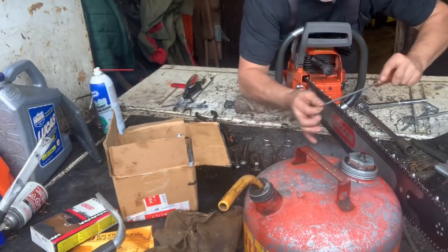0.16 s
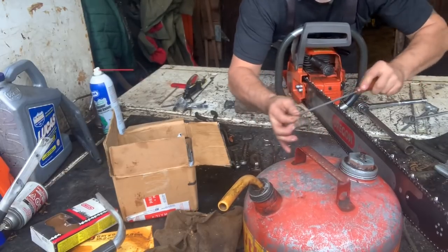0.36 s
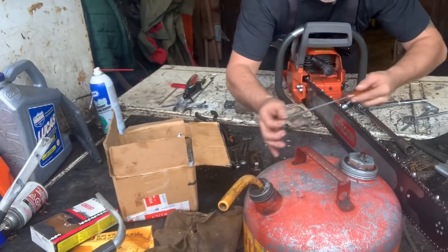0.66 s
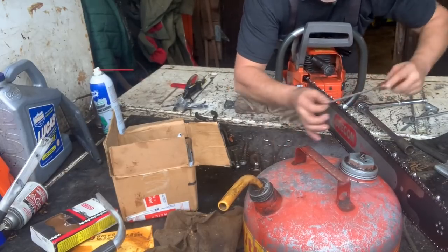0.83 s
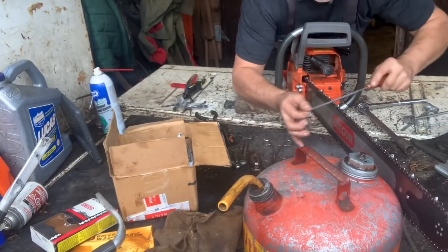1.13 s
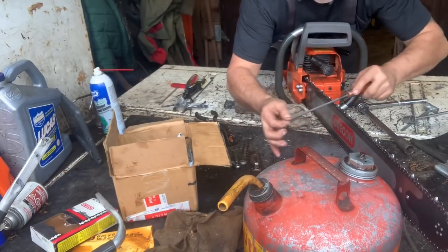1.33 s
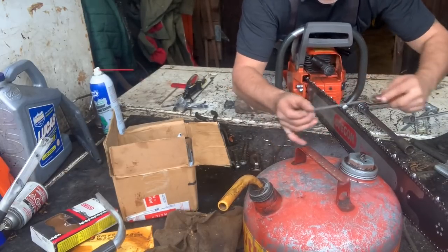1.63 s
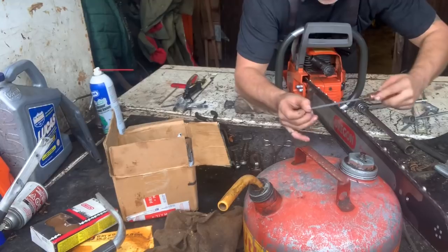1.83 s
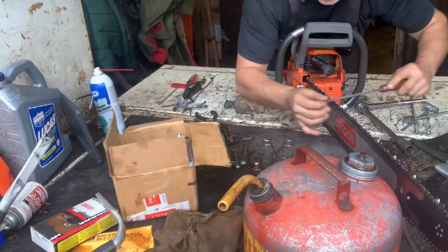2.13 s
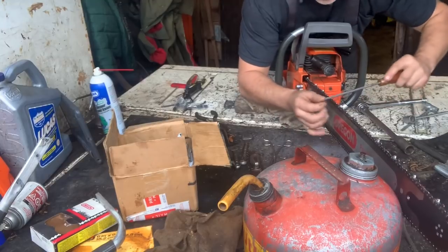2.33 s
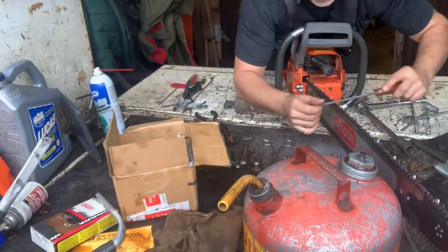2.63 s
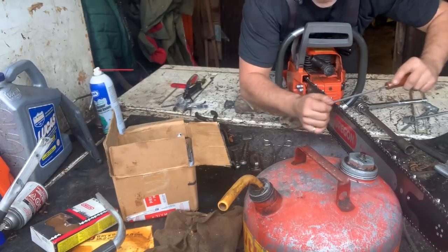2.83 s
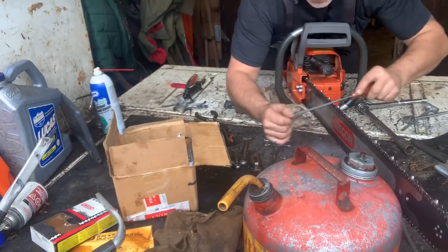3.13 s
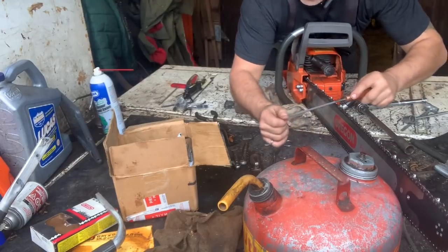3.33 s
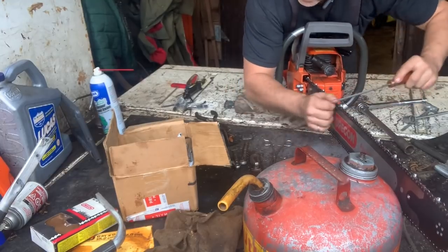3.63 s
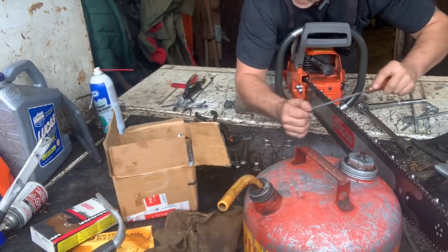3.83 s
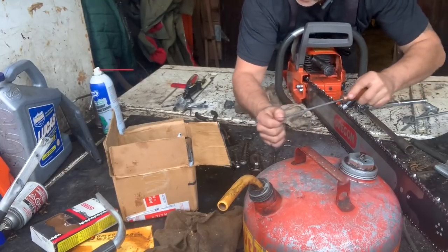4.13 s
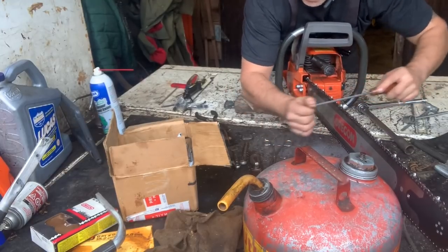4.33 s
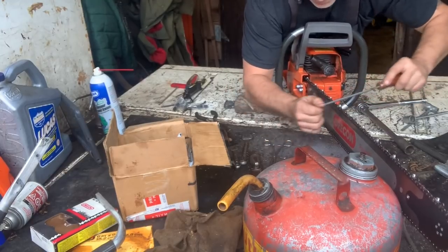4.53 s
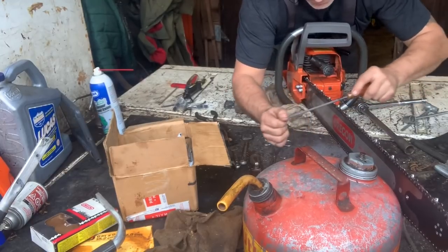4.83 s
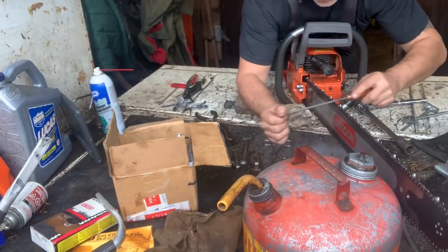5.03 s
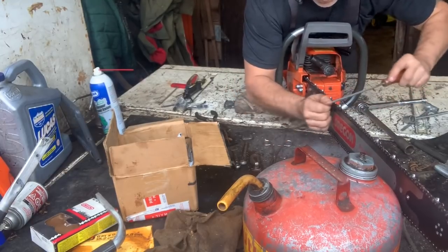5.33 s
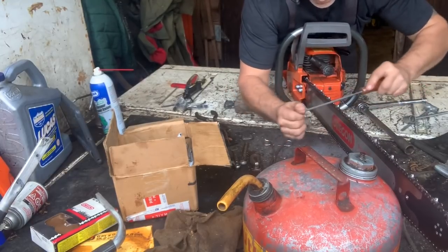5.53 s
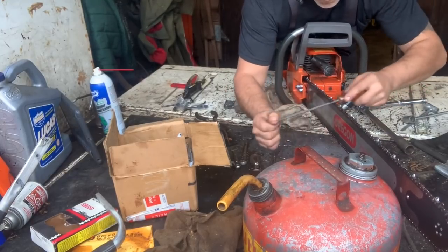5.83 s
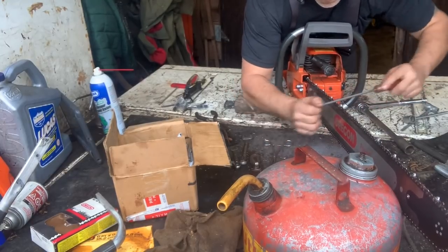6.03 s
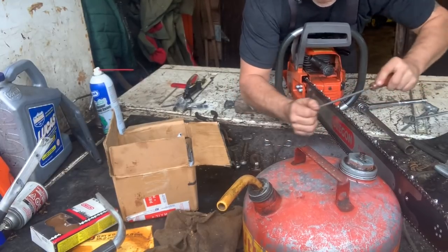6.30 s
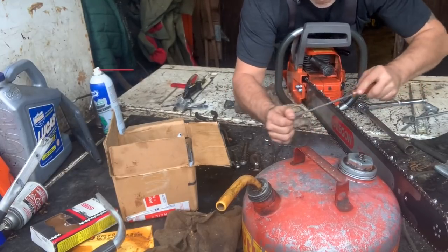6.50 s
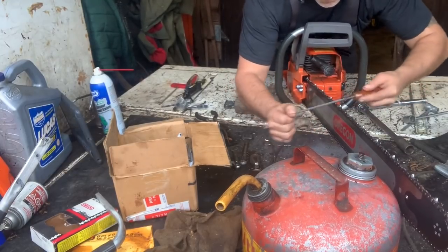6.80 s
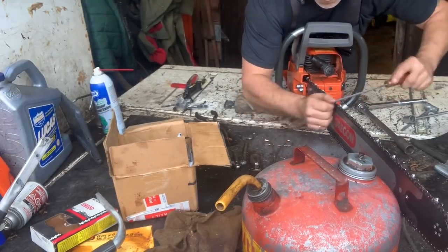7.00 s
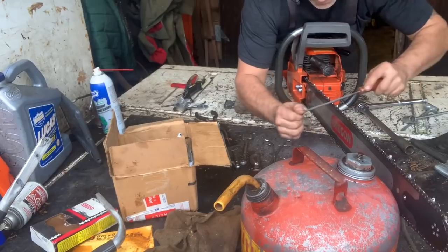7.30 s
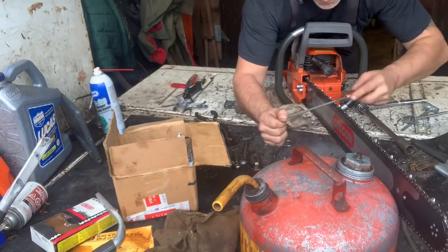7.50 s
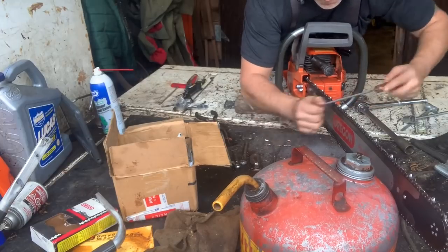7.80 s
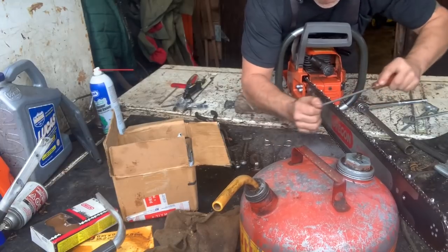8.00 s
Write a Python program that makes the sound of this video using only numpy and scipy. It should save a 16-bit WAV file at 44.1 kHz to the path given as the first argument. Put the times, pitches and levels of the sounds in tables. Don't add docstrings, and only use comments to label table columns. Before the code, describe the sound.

Steady hand-filing of chainsaw teeth: bright, coarse metal rasps of about half a second, broken draw-back scrapes, small knocks, faint room air.

```python
import sys
import numpy as np
from scipy import signal
from scipy.io import wavfile
from scipy.ndimage import uniform_filter1d

SR = 44100
rng = np.random.default_rng(int(sys.argv[2]) if len(sys.argv) > 2 else 0)


def to_wav(sig):
    pcm = np.clip(np.atleast_2d(sig), -1, 1) * 32767
    pcm = np.round(pcm).astype(np.int16)
    wavfile.write(sys.argv[1], SR, pcm.T)


def voltage_ratio(decibels):
    exponent = np.asarray(decibels, float) / 20
    return 10 ** exponent


N = 359415

# f/Hz, width/Hz, level/dB
PULL_RING = [(647, 11, 0), (1150, 26, -11.5), (1440, 850, -5.5), (2670, 79, -6), (3230, 69, -6),
             (3860, 97, -29), (4210, 95, 2), (5440, 290, -4.5), (6340, 86, 0)]
# f/Hz, density level/dB per Hz
PULL_FILL = [(150, -14.5), (300, -13.5), (700, -13), (1500, -16), (3000, -8), (5500, -7), (6750, -13),
             (7100, -21.5), (8000, -21), (16000, -64)]
# f/Hz, width/Hz, level/dB
TOP_RING = [(11440, 160, 2.3), (12050, 340, 3.7), (14970, 410, 1)]
# f/Hz, density level/dB per Hz
TOP_FILL = [(9000, -53), (10300, -10), (10600, -3), (11500, -5.5), (14500, -0.5), (15700, -17),
            (15950, -36)]
# f/Hz, width/Hz, level/dB
BENDING_MODES = [(99.6, 24, 0), (126.9, 17.3, 1.5), (63, 55, -15.5)]
# f/Hz, width/Hz, level/dB
TWISTING_MODES = [(194.6, 18, 1), (217, 31, -1.5), (280, 30, -17.5)]


def push_hand():
    # t/s, length/s, peak pressure level/dB, peak after/s, sag before lifting/dB
    pushes = [
        (0.0, 0.06, -49.5, 0.0015, 18),
        (.052, 0.49, -37, 0.16, 5.5),
        (.91, 0.51, -37, 0.18, 5.5),
        (2.788, 0.48, -33, 0.21, 16),
        (3.572, 0.51, -34.5, 0.22, 8.5),
        (4.411, 0.48, -34.5, 0.17, 8.5),
        (5.24, 0.49, -35.5, 0.17, 4),
        (6.101, 0.52, -35.5, 0.15, 7.5),
        (6.966, 0.53, -36.5, 0.17, 7),
        (7.848, 0.42, -36.5, 0.15, 5),
    ]
    return hand_force(pushes, landing_s=.002, touch_db=-6, bite_s=.02, climb_db_per_s=36,
                      lift_s=.045, lift_db=-19, sizzle=(-13, 4.9, 0.24))


def pull_hand():
    # t/s, length/s, peak pressure level/dB, peak after/s, sag before lifting/dB
    pulls = [(.58, 0.047, -58, 0.056, 0.1), (.624, 0.25, -40.5, 0.044, 2.5),
             (1.64, 0.046, -45.5, .006, 4.6), (1.69, 0.17, -43.5, 0.0078, 3.7),
             (1.833, 0.15, -40, 0.011, 22), (2.081, 0.05, -42.5, 0.012, 7.9),
             (2.114, 0.17, -40.5, 0.06, 19.7), (2.36, 0.11, -85, 0.068, 3), (2.562, 0.2, -38.5, 0.12, 8.7),
             (3.287, .04, -49, .006, 1), (3.3, 0.14, -35, 0.02, 8.3), (3.43, .08, -36.5, 0.0088, 3.5),
             (3.47, 0.08, -37, 0.034, 6), (4.247, 0.11, -39, 0.04, 1.04), (4.319, 0.08, -34.5, 0.019, 13),
             (5.029, 0.19, -41, 0.083, 1.4), (5.802, 0.12, -49.5, 0.067, 0.9),
             (5.922, 0.16, -38, 0.011, 4.5), (6.7, 0.038, -47.5, 0.019, 3.7),
             (6.744, 0.2, -37.5, 0.033, 4.5), (7.55, .05, -54, .02, .3), (7.572, 0.28, -39.5, 0.089, 5.1)]
    return hand_force(pulls, landing_s=.004, touch_db=-11, bite_s=.0075, climb_db_per_s=45,
                      lift_s=.028, lift_db=-18, sizzle=(-9, 2.2, 0.35))


def hand_force(strokes, landing_s, touch_db, bite_s, climb_db_per_s, lift_s, lift_db, sizzle):
    out = np.zeros((2, N))
    start_db, along_db, loss = sizzle
    for start, length, peak_db, peak_s, sag_db in strokes:
        at = np.arange(max(round(start * SR), 0), min(round((start + length) * SR), N))
        t = at / SR - start
        knees = [0, min(bite_s, peak_s / 2), peak_s, length - min(lift_s, length / 3), length]
        knees = np.maximum.accumulate(knees)
        bite_db = -climb_db_per_s * peak_s
        under_db = np.interp(t, knees, [touch_db + bite_db, bite_db, 0, -sag_db, lift_db - sag_db])
        edge = np.clip(np.minimum(t / landing_s, (length - t) / .002), 0, 1)
        out[0, at] = voltage_ratio(peak_db + under_db) * edge
        out[1, at] = voltage_ratio(start_db + along_db * t / length + loss * under_db)
    return out


def push_stroke(hand):
    # f/Hz, width/Hz, level/dB
    push_ring = [(662.4, 33, 0), (879, 115, -1.5), (1454, 360, -3), (1860, 96, -3), (2420, 113, 0),
                 (2642, 61, 5), (3112, 530, 1.5), (3070, 60, -1.5), (4170, 188, 4), (5200, 59, -6),
                 (5830, 110, -1.5), (6090, 50, -2), (6400, 40, -7), (6710, 56, -1.5), (7360, 87, -7.5)]
    # f/Hz, density level/dB per Hz
    push_fill = [(150, -20), (300, -2.5), (700, -14.5), (1500, -6), (3000, -10.5), (5500, -6), (6600, -13),
                 (7600, -19), (8100, -21.5), (16000, -77)]
    bites = grit(14000, spread_db=1.54, chatter_db=0.91)
    return stroke(hand, (push_ring, push_fill, TOP_RING, TOP_FILL), bites, patch_db=2.5, after_db=-28.5)


def pull_stroke(hand):
    # f/Hz, width/Hz, level/dB
    pull_top_ring = [(11460, 170, 7.5), (13300, 320, 6), (14760, 180, 7.5)]
    # f/Hz, density level/dB per Hz
    pull_top_fill = [(9000, -35), (10500, -12), (10900, -7), (12000, -5), (13700, -9), (15200, -13),
                     (15450, -17.5), (15950, -44)]
    colour = PULL_RING, PULL_FILL, pull_top_ring, pull_top_fill
    bites = grit(12000, spread_db=1.8, chatter_db=1.35)
    return stroke(hand, colour, bites, patch_db=3.5, after_db=-46.0)


def stroke(hand, colour, bites, patch_db, after_db):
    # f/Hz, width/Hz, level/dB
    long_ring = [(785, 9.6, -23), (1150, 5.4, -7.5), (1584, 1.8, 14), (2550, 13, 4), (2980, 4, 3),
                 (4500, 5.6, -6)]
    pressure, top_gain = hand
    drive = pressure * bites
    gaps = (0.0038, -.004, -0.043, -0.0049)
    cluster = [(f * (1 + gap), w, db) for f, w, db in long_ring for gap in gaps]
    after = voltage_ratio(after_db) * body(drive, cluster, [(20, -75), (400, -72.0)])
    heard = ports(drive, drive * top_gain, *colour)
    return patchy(heard + [after, .9 * np.roll(after, 300)], patch_db)


def grit(bites_per_s, spread_db, chatter_db):
    size = voltage_ratio(spread_db * np.minimum(rng.exponential(1, N), 5)) * rng.choice([-1, 1], N)
    bitten = rng.random(N) < bites_per_s / SR
    return evened(size * bitten * voltage_ratio(chatter_db * wander(hz=65.5)))


def ports(drive, top, ring, fill, top_ring, top_fill):
    # f/Hz, width/Hz, level/dB
    across_ring = [(374, 35, 13.5), (550, 100, 10.5), (866, 280, 8.5), (1850, 660, 8), (2600, 220, 15.5),
                   (3186, 131, -55), (3403, 123, 20), (4177, 191, -17), (4630, 89, 24.5), (4880, 133, 10.5),
                   (5340, 192, -2.5), (6029, 83, -10)]
    # f/Hz, density level/dB per Hz
    across_fill = [(100, -29), (300, -5.5), (1200, -0.5), (2500, 9.5), (5500, -14), (6500, -9), (8000, -30),
                   (16000, -83)]
    # f/Hz, width/Hz, level/dB
    across_top_ring = [(6600, 200, 2), (8010, 150, -18), (8700, 2000, -2.5), (9905, 107, -16),
                       (10700, 280, -6), (11412, 244, -12.5)]
    # f/Hz, density level/dB per Hz
    across_top_fill = [(4500, -49), (6000, 0), (7000, -13.5), (10000, -17), (12200, -9), (12500, -56),
                       (16000, -76)]
    mid = voltage_ratio(-1.15) * sliding(drive, ring, fill, shift=0.0097, slide_hz=2.45)
    mid += body(top, top_ring, top_fill)
    across = voltage_ratio(-1.0) * sliding(drive, across_ring, across_fill, shift=0.017, slide_hz=4.1)
    across += voltage_ratio(5.5) * body(top, across_top_ring, across_top_fill)
    return np.array([mid, np.roll(across, 9)])


def sliding(x, ring, fill, shift, slide_hz):
    angle = np.pi / 4 * (1 + np.tanh(wander(slide_hz)))
    low = [(f * (1 - shift), w, db) for f, w, db in ring]
    high = [(f * (1 + shift), w, db) for f, w, db in ring]
    return body(x * np.cos(angle), low, fill) + body(x * np.sin(angle), high, fill)


def patchy(x, patch_db):
    z = signal.stft(x, nperseg=256, noverlap=192)[2]
    patches = rng.standard_normal(z.shape[1:][::-1]).T
    for _ in range(2):
        patches = uniform_filter1d(patches, size=2, axis=0)
        patches = uniform_filter1d(patches, size=16, axis=1)
    gain = evened(voltage_ratio(patch_db * evened(patches)))
    return signal.istft(z * gain, nperseg=256, noverlap=192)[1][:, :N]


def body(x, ring, fill):
    hz = abs(np.fft.fftfreq(16384, 1 / SR))
    power = voltage_ratio(read(fill, hz)) ** 2
    for f, width, db in ring:
        power += voltage_ratio(db) ** 2 / (1 + (2 * (hz - f) / width) ** 2) ** 2
    log_gain = np.log(power + 1e-10) / 2
    taps = np.fft.ifft(np.exp(np.conj(signal.hilbert(log_gain)))).real[:8192]
    return signal.oaconvolve(x, taps / np.linalg.norm(taps))[:N]


def read(points, hz):
    f, value = np.transpose(points)
    return np.interp(np.log(hz + 1), np.log(f + 1), value)


def evened(x):
    return x / np.sqrt(np.mean(x ** 2) + 1e-20)


def wander(hz):
    return evened(signal.sosfilt(signal.butter(2, hz, fs=SR, output="sos"), rng.standard_normal(N)))


def knocks():
    # t/s, peak level/dB, thud relative level/dB
    knock_rows = [(1.646, -30, -21), (1.6775, -33, -15), (1.692, -19, -40), (1.842, -33, -24),
                  (1.946, -38.5, -18), (2.088, -22.5, -13.5), (2.119, -20.5, -21), (2.796, -41, -19),
                  (3.288, -43, 0.5), (3.317, -31.5, -24), (4.2523, -44, -4), (4.321, -23, -25),
                  (4.344, -30.5, -27), (4.419, -37, -21), (5.036, -41, -24), (5.8067, -48, 4),
                  (5.9275, -31, -36), (6.106, -39, -19), (6.707, -44, 0), (6.749, -36, -14.5),
                  (7.576, -35, -5.5)]
    crack, thud, t = np.zeros(N), np.zeros(N), np.arange(600) / SR
    decay = voltage_ratio(-60 * t / 0.035) * np.minimum(t / 0.0008, 1)
    for s, db, thud_db in knock_rows:
        at = round(s * SR)
        crack[at:at + len(t)] += voltage_ratio(db - 9.0) * rng.standard_normal(len(t)) * decay
        thud[at] += voltage_ratio(db + thud_db + 19.5)
    thud_fill = [(30, -42.5), (300, -3.0), (700, -12.5), (1500, -56.0)]
    thud = body(thud, TWISTING_MODES + BENDING_MODES, thud_fill)
    cracks = ports(crack, voltage_ratio(-5.5) * crack, PULL_RING[2:], PULL_FILL, TOP_RING, TOP_FILL)
    return cracks + [thud, .1 * thud]


def grabs(bites, width_hz):
    # t/s, half length/s, f/Hz, level/dB
    grab_rows = [(0.675, 0.02, 6400, -39), (.67, .01, 5400, -49), (.745, .015, 6400, -48),
                 (.795, .02, 6400, -46), (.715, 0.017, 5450, -43), (0.705, 0.05, 4250, -43.5),
                 (1.762, 0.035, 3620, -46), (1.856, 0.036, 3600, -49), (2.15, 0.056, 4470, -42),
                 (2.6, 0.04, 5290, -44.5), (2.698, 0.025, 5540, -45.5), (2.868, 0.055, 2560, -39.5),
                 (2.185, .02, 3150, -46), (3.345, 0.069, 5450, -37.5), (3.346, 0.07, 2690, -36.5),
                 (3.355, 0.021, 4240, -30), (3.8, 0.023, 5500, -40), (4.33, 0.044, 2980, -33.5),
                 (4.34, 0.029, 4270, -40), (4.35, 0.023, 5740, -43), (5.078, 0.07, 5650, -43),
                 (5.058, 0.043, 4360, -44.5), (6.7, 0.039, 4300, -48), (5.956, 0.042, 4670, -43),
                 (6.779, 0.038, 4500, -41.5), (6.89, 0.038, 4340, -44), (7.69, 0.047, 4360, -40.5),
                 (7.692, 0.042, 5800, -40.5), (5.942, 0.029, 5380, -35), (5.975, 0.06, 6100, -40.5),
                 (3.355, .03, 14700, -38), (3.8, 0.034, 11500, -46), (3.45, 0.039, 14700, -48),
                 (6.73, .02, 11200, -51), (6.875, .012, 12000, -46), (2.64, 0.086, 440, -48),
                 (3.317, 0.025, 620, -46.5), (1.005, 0.075, 3250, -43), (1.27, 0.033, 3200, -40),
                 (6.5, 0.022, 4200, -40), (2.096, .01, 5600, -37)]
    out = np.zeros(N)
    for s, length, hz, db in grab_rows:
        at = np.arange(round((s - length) * SR), round((s + length) * SR))
        band = signal.butter(2, [hz - width_hz / 2, hz + width_hz / 2], "band", fs=SR, output="sos")
        out[at] += voltage_ratio(db) * evened(signal.sosfilt(band, bites[at])) * np.hanning(len(at))
    return np.array([out, 0.69 * np.roll(out, 23)])


def whine():
    # t/s, length/s, from f/Hz, to f/Hz, level/dB
    tooth_rows = [(.601, .026, 1555, 1545, -55.5), (.636, .055, 1405, 1455, -51),
                  (.681, .061, 1505, 1485, -54), (.771, .1, 1485, 1160, -51),
                  (1.645, 0.015, 1620, 1525, -43), (2.15, .06, 1500, 1050, -47.5),
                  (2.591, 0.096, 1395, 1565, -47.5), (2.681, 0.076, 1550, 1250, -48),
                  (2.815, 0.054, 1546, 1690, -43), (2.9, 0.047, 1850, 2050, -39),
                  (2.861, .045, 860, 872, -41), (3.298, .09, 470, 1628, -44.5),
                  (3.49, 0.052, 1150, 1750, -47), (4.315, 0.068, 1570, 1330, -45),
                  (5.031, 0.038, 1510, 1524, -44), (5.156, .051, 1460, 902, -45),
                  (5.931, 0.033, 1720, 1885, -51), (5.991, 0.074, 1775, 885, -44.5),
                  (6.755, 0.053, 1455, 1595, -42), (6.866, .067, 1605, 1080, -45.5),
                  (7.615, 0.058, 1537, 1460, -44.5), (7.676, 0.025, 1005, 855, -49),
                  (7.746, 0.068, 1705, 1055, -43.5)]
    # t/s, length/s, from f/Hz, to f/Hz, level/dB
    lingers = [(1.42, 0.23, 1600, 1600, -74.5), (1.43, 0.1, 3100, 3080, -78), (1.45, 0.15, 2640, 2640, -82),
               (1.96, 0.061, 1100, 1100, -66), (4.12, .13, 1630, 1625, -68.5), (4.1, 0.22, 2630, 2630, -76),
               (4.88, .15, 4380, 4380, -76), (4.88, 0.17, 3220, 3220, -76), (4.88, 0.21, 2500, 2500, -77),
               (4.9, 0.15, 1600, 1600, -75), (6.62, 0.044, 1600, 1600, -79)]
    tone = glides(tooth_rows, bend=1.1, jitter=0.02, jitter_hz=90, catch_db=2.0, catch_hz=50, second=0.37)
    tone += glides(lingers, bend=1.1, jitter=0.0099, jitter_hz=60, catch_db=6.0, catch_hz=25, second=0.01)
    return np.array([tone, 0.67 * np.roll(tone, 9)])


def glides(rows, bend, jitter, jitter_hz, catch_db, catch_hz, second):
    out = np.zeros(N)
    waver = 1 + jitter * wander(jitter_hz)
    catch = evened(voltage_ratio(catch_db * wander(catch_hz)))
    for k, (start, length, from_hz, to_hz, db) in enumerate(rows):
        at = np.arange(round(start * SR), round((start + length) * SR))
        chance = at - k * 999
        hz = from_hz + (to_hz - from_hz) * np.linspace(0, 1, len(at)) ** bend
        phase = 2 * np.pi * np.cumsum(hz * waver[chance]) / SR
        tone = np.sqrt(2) * (np.sin(phase) + second * np.sin(2 * phase))
        out[at] += voltage_ratio(db) * catch[chance] * signal.windows.tukey(len(at), .45) * tone
    return out


def shake(push, pull):
    # t/s, bending level/dB, twisting relative level/dB
    jolts = [(.11, -37, -13), (.22, -36, -13), (.42, -37, -4), (1.0, -38, -10), (1.329, -29.5, -13),
             (1.68, -48, -3), (1.86, -52.5, -1.5), (2.12, -58, 7.5), (2.63, -61, 9), (2.93, -47, -4),
             (3.14, -36, -4), (3.78, -34.5, -21), (3.99, -26.5, -20), (4.62, -36, -4), (4.71, -30, -7.5),
             (4.97, -48.5, -21), (5.12, -48, -7), (5.32, -33.5, -14), (5.54, -37, -1), (6.16, -35.5, -7),
             (6.49, -32, -4), (7.02, -37, -12), (7.13, -36.5, -4.5), (7.26, -43, -4), (7.33, -47.5, 9),
             (7.42, -52, -15), (8.08, -41.5, 2)]
    ring_s, lag_s, jolt_s = 0.059, 0.0073, 0.09
    t, force = np.arange(N) / SR, rng.standard_normal((3, N))
    keep = np.exp(-1 / (ring_s * SR))
    pressed = voltage_ratio(-0.5) * np.roll(push, round(lag_s * SR)) + voltage_ratio(-15.5) * pull
    steady = signal.lfilter([1 - keep], [1, -keep], pressed)
    bending, twisting = steady ** 2, (voltage_ratio(-5) * steady) ** 2
    for s, db, twist_db in jolts:
        swell = np.exp(-2 * abs(t[::64] - s) / jolt_s).repeat(64)[:N]
        bending += voltage_ratio(2 * db) * swell ** 2
        twisting += voltage_ratio(2 * (db + twist_db)) * swell ** 2
    bend = evened(body(force[0], BENDING_MODES, [(20, -54), (70, -35), (400, -82.0)]))
    twist = [evened(body(f, TWISTING_MODES, [(20, -44), (400, -62.0)])) for f in force[1:]]
    twist = np.sqrt(twisting) * np.array(twist)
    side = voltage_ratio(-18.0) * np.sqrt(bending) * np.roll(bend, 5000) + voltage_ratio(-7) * twist[1]
    return np.array([np.sqrt(bending) * bend + twist[0], side])


def room(x, turns_per_s):
    turn = np.pi * turns_per_s * np.arange(N) / SR
    out = np.zeros((2, N))
    for k in range(3):
        path = np.sqrt(2 / 3) * np.cos(turn + k * np.pi / 3)
        out += signal.fftconvolve(x * path, tails(), axes=1)[:, :N]
    return out


def tails():
    # f/Hz, reverberation time t60/s
    decay_times = [(150, 0.55), (660, 0.32), (1740, 0.24), (4590, 0.17), (12000, 0.13)]
    taps = np.zeros((2, SR // 2))
    at = np.arange(200, SR // 2 - 20, 20) + rng.integers(0, 20, (2, (SR // 2 - 201) // 20))
    np.put_along_axis(taps, at, rng.choice([-1., 1.], at.shape), 1)
    hz, t, z = signal.stft(taps, SR, nperseg=256)
    tail = signal.istft(z * voltage_ratio(-60 * t / read(decay_times, hz)[:, None]), SR, nperseg=256)[1]
    return tail / np.linalg.norm(tail[0])


def far_machine():
    # t/s, length/s, from f/Hz, to f/Hz, level/dB
    drones = [
        (3.33, 0.48, 63.8, 87.3, -49),
        (5.7, 0.49, 107.6, 112, -45.5),
        (6.6, 0.39, 108.6, 107.7, -42.5),
        (7.45, 0.53, 107.6, 106.6, -44.5),
        (7.5, 0.12, 62, 58, -42),
    ]
    return glides(drones, bend=1.02, jitter=0.01, jitter_hz=2.8, catch_db=-2.0, catch_hz=14.0, second=0.13)


def air():
    # f/Hz, density level/dB per Hz
    air_fill = [(18, -66), (30, -15.5), (75, 2.5), (210, -26.5), (404, -27), (962, -28), (4000, -45.5),
                (7400, -50), (7900, -73), (10200, -78), (10800, -47.5), (16000, -58)]
    # f/Hz, density level/dB per Hz
    across_air = [(18, -71), (75, -13), (210, -27), (962, -25.5), (4000, -46.5), (12300, -51.5),
                  (12600, -89.5), (16000, -90.5)]
    mid = evened(body(rng.standard_normal(N), [], air_fill))
    side = evened(body(rng.standard_normal(N), [], across_air))
    rumble = evened(body(rng.standard_normal(N), [(46, 52, 0.01)], [(20, -47), (400, -70.5)]))
    rumble *= voltage_ratio(2.5 * wander(hz=4.7))
    hiss = voltage_ratio(-59.5) * voltage_ratio(1.25 * wander(hz=2.8)) * np.array([mid, voltage_ratio(-9) * side])
    return hiss + voltage_ratio(-63.5) * np.array([rumble, .12 * rumble[::-1]])


def scene():
    push, pull = push_hand(), pull_hand()
    steel = push_stroke(push) + pull_stroke(pull) + knocks()
    steel += grabs(grit(8000, spread_db=2.4, chatter_db=4.1), width_hz=415)
    steel += whine()
    steel = voltage_ratio(-1.51) * steel + voltage_ratio(-8.0) * room(steel, turns_per_s=1.71)
    low = shake(push[0], pull[0]) + air()
    low[0] += far_machine()
    near_band = signal.butter(2, [750, 5500], "band", fs=SR, output="sos")
    lean = 0.27 * signal.sosfiltfilt(near_band, steel[0]) + 0.094 * low[0]
    mid, side = steel + low
    return np.array([mid + side - lean, mid - side + lean])


def top_cut(x):
    return signal.sosfilt(signal.butter(12, 16510, fs=SR, output="sos"), x)


def record(dry):
    low_cut = signal.sosfilt(signal.butter(3, 30., "high", fs=SR, output="sos"), dry)
    band_limit = signal.firwin(511, 15900, window=("kaiser", 9), fs=SR)
    mix = signal.oaconvolve(low_cut, band_limit[None], "same")
    return top_cut(mix)


dry = scene()
out = record(dry)
to_wav(out)
```